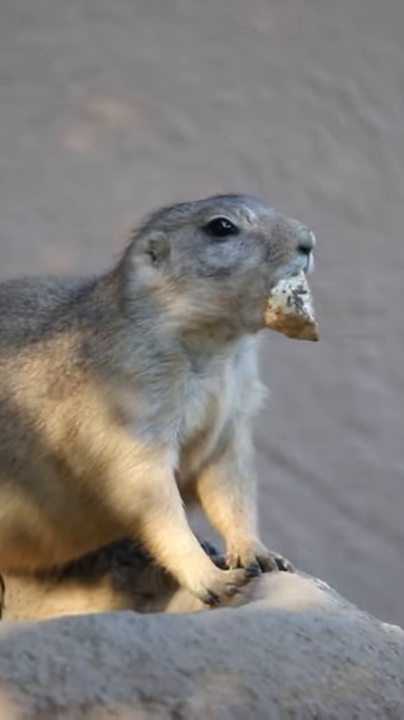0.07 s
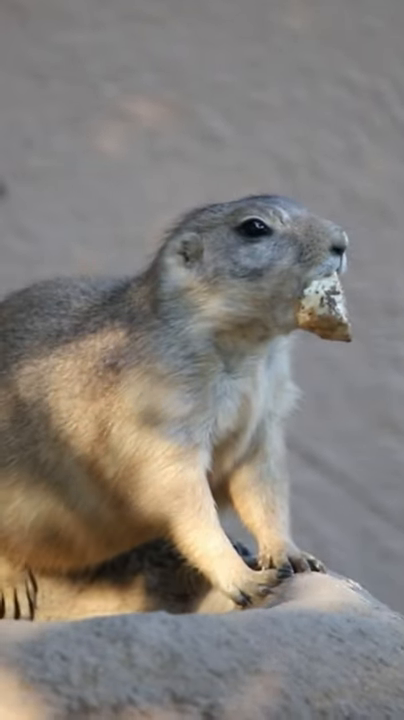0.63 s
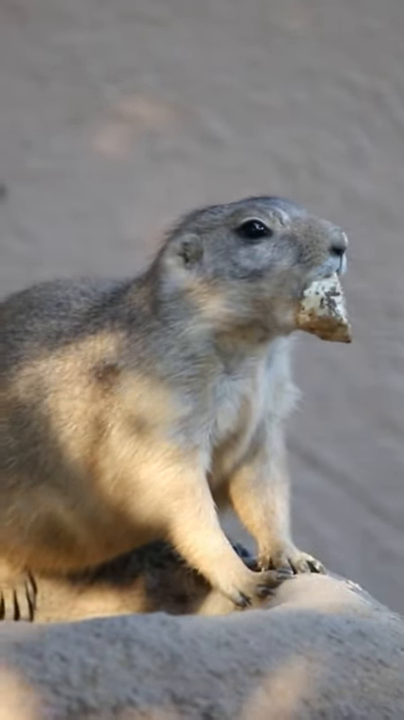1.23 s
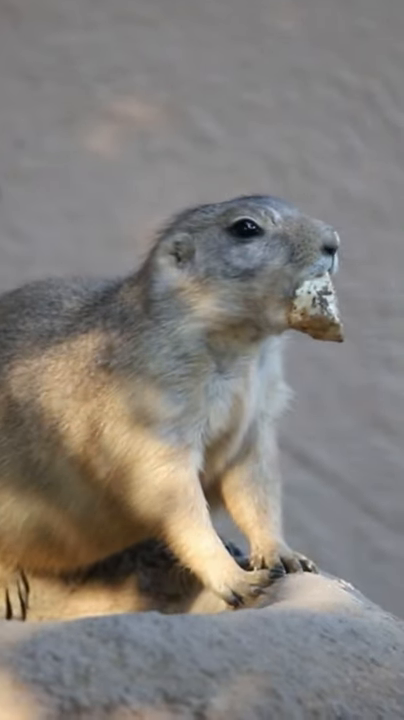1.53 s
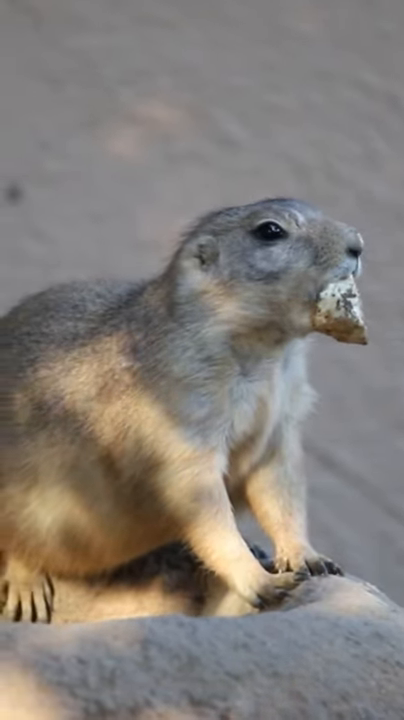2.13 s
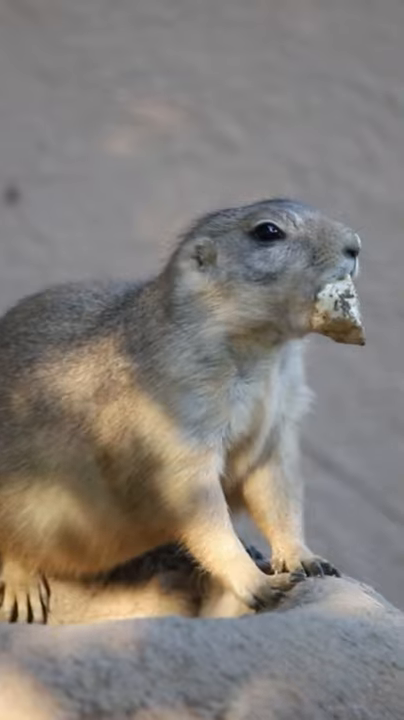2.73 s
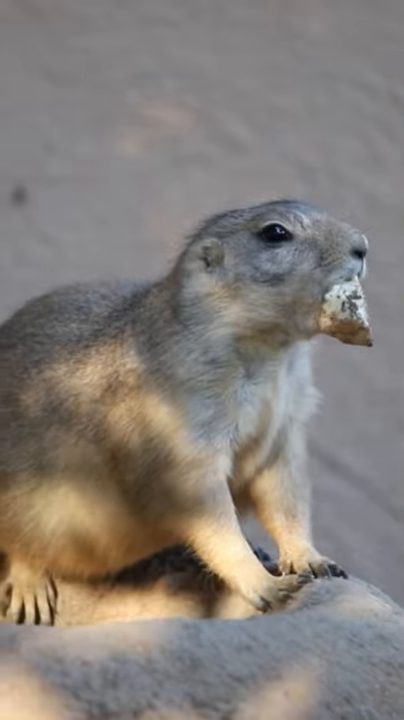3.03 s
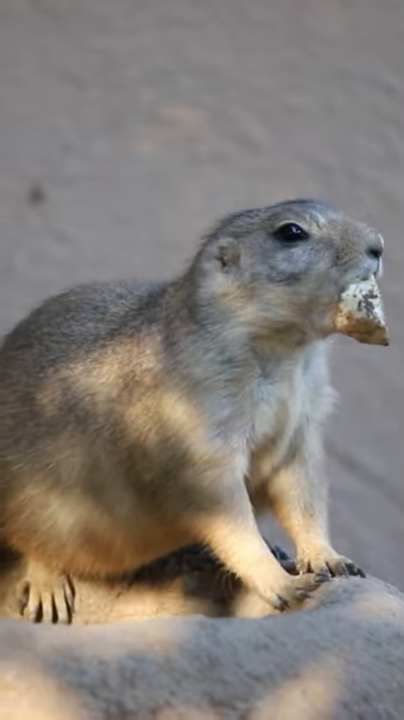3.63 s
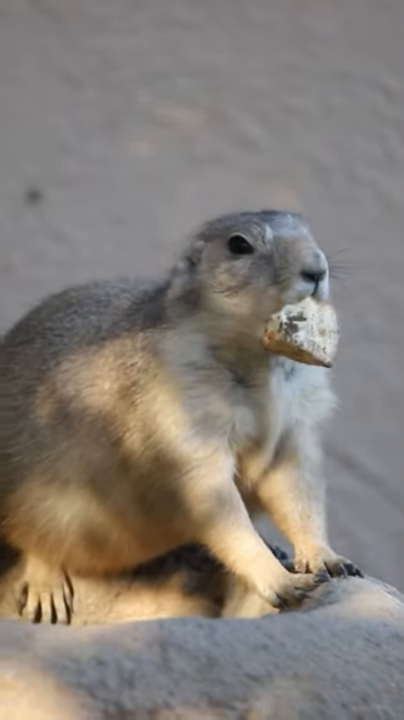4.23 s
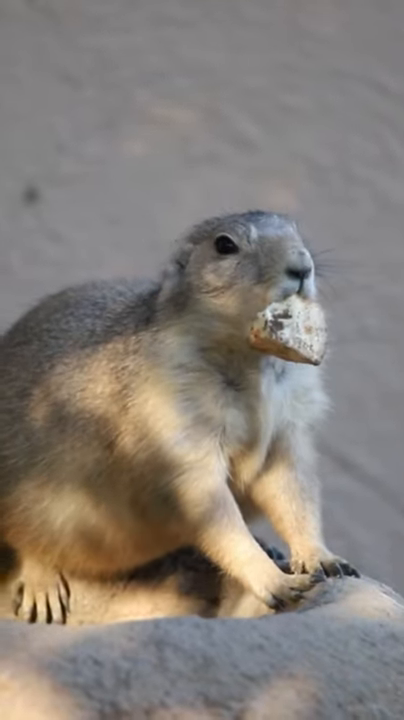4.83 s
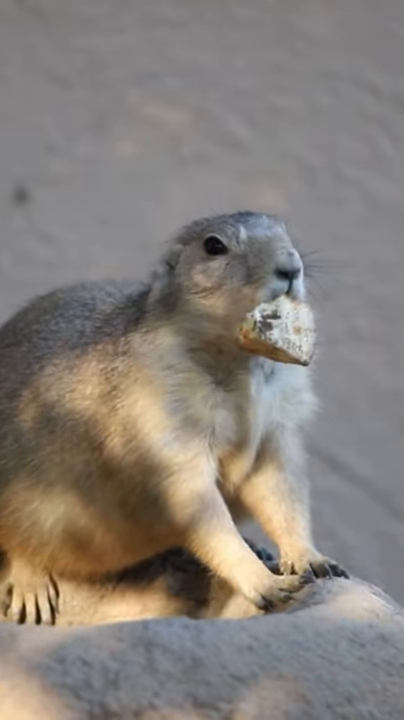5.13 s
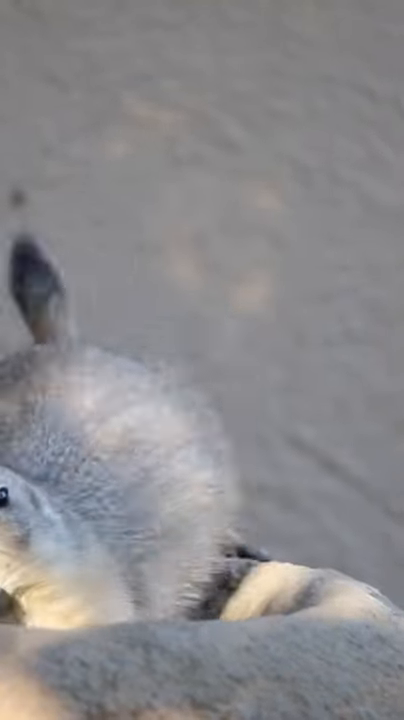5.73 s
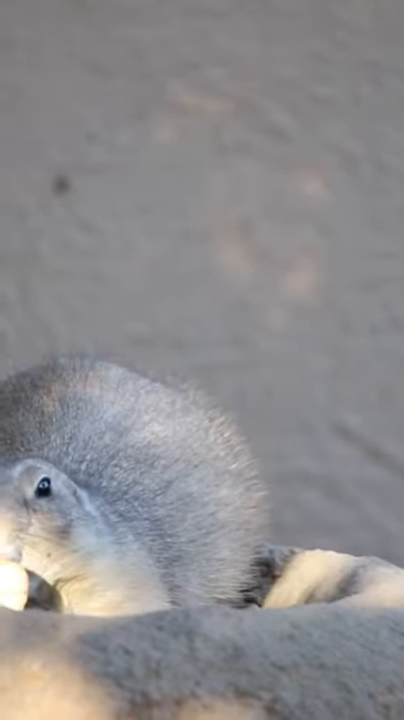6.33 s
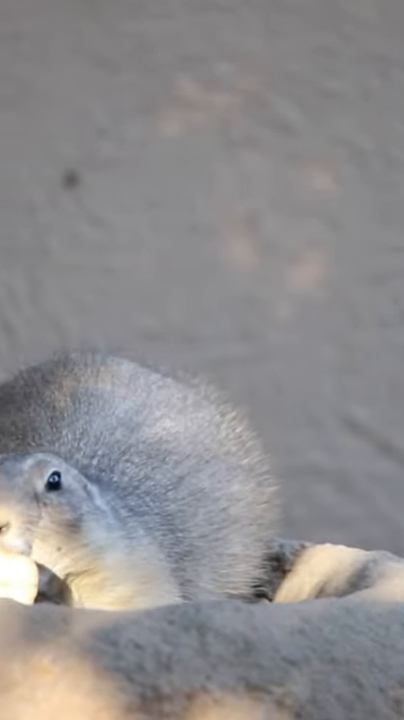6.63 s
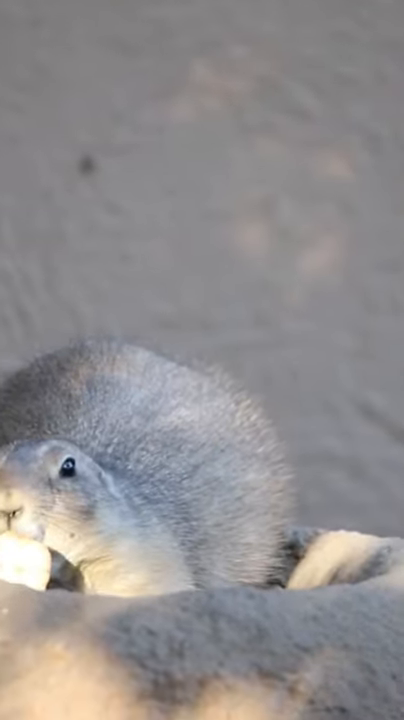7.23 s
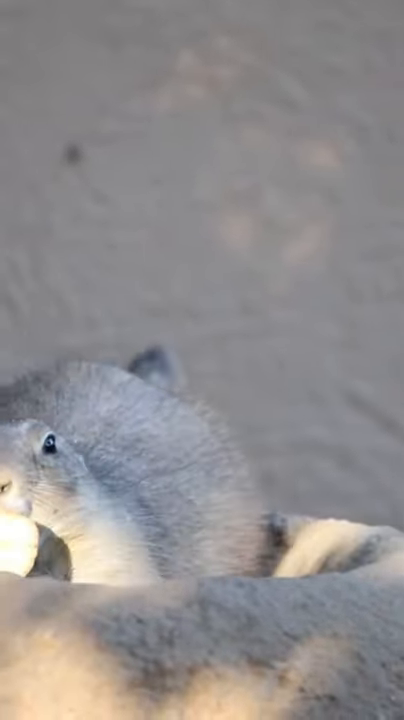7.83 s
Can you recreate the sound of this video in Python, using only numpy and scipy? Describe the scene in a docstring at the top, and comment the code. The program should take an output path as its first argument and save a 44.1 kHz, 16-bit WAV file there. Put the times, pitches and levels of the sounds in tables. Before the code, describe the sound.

A prairie dog barks close by in short, sharp, high yips, with a small bird trilling faintly in the quiet outdoor air.

```python
"""Eighteen barks, close to the microphone: a prairie dog with food in its mouth, in a quiet outdoor pen.
Each bark is about 40 ms of vocal-fold pulses on an arch of pitch; the hard ones start clean and break
into a rasp. Between them the animal wheezes softly through its nose. A few ticks and low bumps sound
nearby. Farther out a small bird repeats a four-note trill of falling whistles, and others call far off.
Behind it all lie open air and a faint mains hum, heard in stereo through two closely spaced ports."""
import sys
import numpy as np
from scipy import signal
from scipy.fft import rfft, irfft
from scipy.io import wavfile
from scipy.ndimage import uniform_filter1d, minimum_filter1d

SR = 44100
rng = np.random.default_rng(int(sys.argv[2]) if len(sys.argv) > 2 else 0)


def file_out(sig):
    """Save sig as 16-bit WAV at sys.argv[1]."""
    # one column per channel
    cols = np.atleast_2d(sig).T
    # limit, then scale
    lim = np.clip(cols, -1, 1)
    pcm = np.round(lim * 32767).astype(np.int16)
    wavfile.write(sys.argv[1], SR, pcm)


N = 356328


def prairie_dog(break_hz=1516, break_width_hz=122, full_db=-12, lead_gap_s=.018, after_gap_s=.052):
    """The animal, close up: each bark between two wheezes, rougher and longer above the breaking pitch."""
    # t/s, level/dB, top pitch/Hz, wheeze before/dB, wheeze after/dB, length of the latter/s
    barks = [(.3925, -12.7, 1800, -57, -52, .09), (.798, -16.2, 1630, -50.5, -52.5, .098),
             (1.1683, -16.4, 1631, -49.5, -52.5, .058), (1.7913, -14.8, 1708, -61, -52.5, .079),
             (2.3869, -13.5, 1775, -52, -53, .072), (3.01, -13, 1774, -52, -48.5, .046),
             (3.5415, -11.8, 1799, -60, -49.5, .093), (3.9303, -19.8, 1525, -45.5, -52.5, .036),
             (4.2786, -22.4, 1373, -45.5, -53.5, .056), (4.8768, -12.8, 1766, -51, -48.7, .099),
             (5.2948, -20.1, 1506, -44.5, -52, .115), (5.6586, -15.1, 1672, -46.5, -50.5, .11),
             (6.0301, -16.6, 1595, -43.5, -50, .11), (6.591, -12.3, 1778, -55.5, -49.5, .11),
             (6.9635, -12.7, 1715, -60, -53.5, .036), (7.2952, -13.6, 1683, -46.5, -51.5, .064),
             (7.6506, -20.9, 1483, -46.5, -53, .044), (7.9838, -15.6, 1629, -48.5, -55, .05)]
    # reedier wheezes in the long pauses: t/s, length/s, level/dB, glide/octaves
    pause_wheezes = [(.083, .098, -54.5, -.44), (1.505, .096, -54.5, -.63), (2.116, .054, -48.7, .2),
                     (2.705, .1, -53, -.3), (3.324, .11, -52.5, -.68), (4.594, .085, -49.5, -.21),
                     (6.335, .11, -50, -.45)]
    out = np.zeros(N)
    for s, db, hz, lead_db, after_db, after_s in barks:
        over_hz, soft_db = max(hz - break_hz, 0), max(full_db - db, 0)
        length = .037 + .000023 * over_hz
        rough = max(.07, .99 * (1 - np.exp(-over_hz / break_width_hz)))
        add(out, s, bark(length, db, hz, rough))
        push_at = s - .0013 * soft_db  # a soft bark catches later between its two wheezes
        lead_s = .017 + .0032 * soft_db
        add(out, push_at - lead_gap_s - lead_s, wheeze(lead_s, lead_db, hz=710, glide=.28, airy=.53))
        after = wheeze(after_s, after_db, hz=790 - 1800 * after_s, glide=-.45, airy=.76)
        add(out, push_at + length + after_gap_s, after)
    for s, length, db, glide in pause_wheezes:  # the steeper the fall, the lower and clearer
        add(out, s, wheeze(length, db, hz=625 + 100 * glide, glide=glide, airy=.65 + .6 * glide))
    return out


def bark(length, db, top_hz, rough, alternation=.81, lurch=.13, jitter=.042,
         throb_db=4, throb_hz=125, rasp=.2, dulling=.09):
    """Vocal folds pulse on an arch of pitch; driven hard, they break into uneven strong and weak beats."""
    # course of a bark: share of its length, soft pitch/ratio, hard pitch/ratio, soft push/dB, hard push/dB
    arch = [(0, .97, .88, -3, -7), (.1, .99, .95, -.5, -1), (.24, 1, 1, 0, 1.5), (.45, .99, .97, 0, 0),
            (.65, .965, .94, -1, -1), (.85, .885, .84, -1.5, -6), (1, .75, .73, -4, -13)]
    # resonances of throat and mouth: f/Hz, gain/dB
    throat = [(300, -29), (550, -28), (850, -18.5), (1250, -18.5), (1750, -11), (2080, -13.5), (2650, 0),
              (3200, 1), (3750, 4), (4500, -9), (5300, -5.5), (6100, -10.5), (6850, -19), (7300, -36.5),
              (7800, -30), (8700, -23.5), (10500, -37), (15500, -51)]
    t, u = span(length)
    share, soft_pitch, hard_pitch, soft_db, hard_db = np.transpose(arch)
    effort = min(1, 2 * rough)
    hz = top_hz * np.interp(u, share, soft_pitch + effort * (hard_pitch - soft_pitch))
    push_db = np.interp(u, share, soft_db + effort * (hard_db - soft_db))
    since_break = u - (.42 - .22 * rough)  # harder barks break sooner
    broken = np.sqrt(rough * effort) * np.clip(since_break / .028, .1, 1)
    # the broken folds repeat about every two or three beats, and slip from one pattern to another
    kicks, slips = rng.standard_normal((2, 128))
    pattern = .86 * np.exp(2j * np.pi / rng.uniform(2.1, 3))
    swing = np.tanh(1.5 * evened(signal.lfilter([1], [1, -pattern], kicks).real))
    cycle = np.arange(len(swing))
    turns = np.cumsum(hz) / SR
    turns += broken * np.interp(turns, cycle, lurch * swing + jitter * slips)
    strength = np.maximum(1 + alternation * broken * np.interp(turns, cycle, swing), .05)
    # weak pushes close the folds gently, so the top harmonics come late and leave early
    folds = .5 + sum(gain_of(dulling * push_db * max(k - 2, 0)) * np.cos(2 * np.pi * k * turns)
                     for k in np.arange(1, 12))
    folds -= .25 * broken * np.cos(2 * np.pi * turns)  # the fundamental weakens as the voice breaks
    leak = .012 + .055 * effort
    breath = (leak + rasp * broken) * rng.standard_normal(len(t)) * (1 + np.cos(2 * np.pi * turns))
    # the rasp comes in a few surges
    throb = -np.sin(2 * np.pi * since_break * length * throb_hz * rng.uniform(.7, 1.35))
    surge_db = throb_db * broken * rough ** 2 * throb
    drive = (evened(folds) * strength + breath) * gain_of(push_db + surge_db)
    voice = colour(drive * fade(t, .0015 + .0008 * effort, .003), throat)
    return gain_of(db) * voice / np.sqrt(np.mean(voice[:len(t)] ** 2))


def wheeze(length, db, hz, glide, airy):
    """Air through the animal's nose: a wavering reedy tone in a puff of noise."""
    # resonances of the nose: f/Hz, gain/dB
    nose = [(250, -21.5), (500, -2.5), (750, 1), (1150, 2), (1450, -10.5), (1750, -8.5), (2100, -17),
            (2850, -6), (4000, -23), (5000, -19.5), (8000, -33.5), (14000, -45.5)]
    t, u = span(length)
    waver = .035 * airy * wander(len(t), size=50)
    turns = np.cumsum(hz * 2 ** (glide * (u - .5)) * (1 + waver)) / SR
    reed = sum(np.cos(2 * np.pi * k * turns) for k in np.arange(1, 8))
    puff = colour(2.2 * airy * rng.standard_normal(len(t)), [(900, 0), (3500, 4)])[:len(t)]
    flutter = gain_of(3 * airy * wander(len(t), size=200))
    rise, fall = (.5, .15) if glide > 0 else (.15, .45)  # rising: swell and stop; falling: die away
    shape = fade(t, rise * length, fall * length)
    return gain_of(db) * evened(colour(evened(reed) + puff, nose)[:len(t)] * flutter * shape)


def tick(db, hz, ring_db, t60, width_hz=800):
    """A small dry tick nearby: a snap of noise and one short resonance."""
    t, _ = span(.028)
    spectrum = [(200, -11.5), (900, 7.5), (5000, -9.5), (11000, -15.5), (15000, -25.5)]  # f/Hz, gain/dB
    snap = colour(rng.standard_normal(len(t)), spectrum)[:len(t)]
    pole = np.exp((-np.pi * width_hz + 2j * np.pi * hz) / SR)
    ring = signal.lfilter([1], [1, -pole], snap).real
    click = evened(evened(snap) + gain_of(ring_db) * evened(ring))
    return gain_of(db - 60 * t / t60) * click * fade(t, .0005, .005)


def bump(db, length=.15):
    """A soft swell of deep noise nearby."""
    t, _ = span(length)
    spectrum = [(25, -22), (55, 12), (85, 8), (160, -53), (600, -71), (3000, -90)]  # f/Hz, gain/dB
    noise = colour(rng.standard_normal(len(t)), spectrum)[:len(t)]
    return gain_of(db) * evened(noise * fade(t, .028, .13))


def distant_calls():
    """Well back from the microphone: the trilling bird, and yips and whistles from farther off."""
    # middle of each trill's first full note: t/s
    trills = [.203, .753, 1.121, 1.550, 1.955, 2.486, 2.905, 3.315, 3.748, 4.169, 4.667, 5.128, 5.548,
              5.934, 6.305, 6.706, 7.077, 7.444, 7.853]
    # how loud the bird sings: t/s, level/dB
    trill_level = [(0, -54), (2, -54), (2.5, -48.5), (3.3, -51), (4.2, -55), (8, -52.7)]
    # short yips, rich in overtones: t/s, length/s, level/dB
    yips = [(.236, .085, -56.5), (.727, .03, -53), (1.224, .038, -53), (1.613, .028, -63),
            (1.681, .032, -60.5), (2.216, .04, -58.5), (3.189, .028, -55.5)]
    # birds' whistles, nearly pure: t/s, length/s, start f/Hz, end f/Hz, level/dB
    whistles = [(0, .063, 2540, 2590, -50.5), (.31, .05, 3100, 1960, -53.5), (.542, .52, 2465, 2380, -68),
                (.953, .51, 2080, 2040, -66.5), (6.786, .14, 2960, 2820, -64.5),
                (7.122, .1, 2900, 2780, -59), (7.19, .063, 2800, 2300, -57.5),
                (7.557, .24, 2980, 2750, -57), (7.815, .06, 2740, 3080, -60)]
    out = np.zeros(N)
    for s in trills:
        early_s, notes = trill(np.interp(s, *np.transpose(trill_level)))
        add(out, s - early_s, notes)
    for s, length, db in yips:
        add(out, s, far_call(length, start_hz=1815, end_hz=1895, db=db, overtones_db=1))
    for s, *whistle in whistles:
        add(out, s, far_call(*whistle, overtones_db=-30))
    return out


def trill(db, step_s=.0435, lead_s=.036, lead_db=-10, high_hz=5650, low_hz=4700, note_s=.023):
    """A faint lead note and three full whistles, all sliding down; returns head start/s and sound."""
    t, u = span(note_s)
    shape = fade(t, .011, .01)
    out = np.zeros(SR // 4)
    for at, note_db, pitch in [(0, lead_db, .975)] + [(lead_s + k * step_s, 0, 1) for k in range(3)]:
        hz = (high_hz + (low_hz - high_hz) * u) * pitch * (1 + .004 * rng.standard_normal())
        gain = gain_of(db + note_db + rng.standard_normal())
        add(out, at, gain * np.sin(2 * np.pi * np.cumsum(hz) / SR) * shape)
    return lead_s + note_s / 2, out


def far_call(length, start_hz, end_hz, db, overtones_db):
    """A distant whistle or yip, arched, wavering and fading on its way."""
    t, u = span(length)
    overtones = gain_of(overtones_db)
    arch = .04 * overtones * np.sin(np.pi * u)
    waver = (.01 + .025 * overtones) * wander(len(t), size=25)
    waver += .017 * (start_hz / 2800) ** 6 * wander(len(t), size=400)  # high calls drift more
    hz = (start_hz + (end_hz - start_hz) * u) * (1 + arch + waver)
    angle = 2 * np.pi * np.cumsum(hz) / SR
    tone = np.sin(angle) + overtones * (np.sin(2 * angle) + .3 * np.sin(3 * angle))
    return gain_of(db + 2 * wander(len(t), size=400)) * tone * fade(t, .008, .36 * length)


def pen(x, spread=.45):
    """Short scatter from the pen's walls and rocks, mostly alike in both channels."""
    # decay of the scatter: f/Hz, t60/s
    decay = [(200, .1), (1500, .07), (3500, .06), (7000, .055), (14000, .045)]
    t, _ = span(.083)
    taps = rng.standard_normal((3, len(t))) * (rng.random((3, len(t))) < .15) * (t > .003)
    hz, at, spectra = signal.stft(taps[0] + spread * taps[1:], SR, nperseg=128)
    tail = signal.istft(spectra * gain_of(-60 * at / read(decay, hz)[:, None]), SR, nperseg=128)[1]
    return signal.fftconvolve(x[None], tail / np.linalg.norm(tail[0]), axes=1)[:, :N]


def open_air(db=-61, low_cut_hz=38):
    """The air around the pen: steady noise whose rumble and hiss swell slowly and ease off."""
    # spectrum of the air: f/Hz, relative density/dB
    spectrum = [(20, -8), (32, -2.5), (65, 3), (110, -7), (200, -13), (330, -9.5), (560, -13.5),
                (1040, -13), (2100, -17.5), (3100, -15.5), (5000, -19.5), (8500, -22.5), (12000, -25),
                (15500, -28)]
    # slow swells: t/s, rumble/dB, hiss/dB
    swell = [(0, 3, 0), (1.5, 0, .5), (2.8, 2.5, 1.3), (4.2, -.5, -1.5), (5, 1.5, -.5), (5.7, -1, -1.8),
             (8.08, -2, -.7)]
    # likeness of left and right: f/Hz, correlation
    likeness = [(30, 0.95), (3000, 1), (8000, 0.43), (15000, 0.61)]
    frames, hz = N // 256 + 5, np.fft.rfftfreq(1024, 1 / SR)
    s, *levels = np.transpose(swell)
    rumble_db, hiss_db = (np.interp(np.arange(frames) * 256 / SR, s, level) for level in levels)
    low = read([(120, 1), (350, .14)], hz)[:, None]
    high = read([(500, 0), (2500, .85), (8500, .76), (13000, .22)], hz)[:, None]
    a, b, c, d = rng.standard_normal((frames, len(hz), 4)).T
    same = read(likeness, hz)[:, None]
    left = a + 1j * b
    right = same * left + np.sqrt(1 - same ** 2) * (c + 1j * d)
    gain = gain_of(read(spectrum, hz)[:, None] + low * rumble_db + high * hiss_db)
    air = signal.istft(np.array([left, right]) * gain, nperseg=1024, noverlap=768)[1][:, :N]
    air = signal.sosfilt(signal.butter(4, low_cut_hz, "high", fs=SR, output="sos"), air)
    return gain_of(db) * evened(air)


def mains_hum():
    """Two faint steady tones from the mains, the same in both channels."""
    # f/Hz, level/dB
    tones = [(50.2, -72.5), (150.3, -74)]
    t = np.arange(N) / SR
    return sum(gain_of(db) * np.sin(2 * np.pi * (hz * t + rng.random())) for hz, db in tones)


def microphone_ports(x, lag_s=7e-6):
    """Two closely spaced ports: the sound reaches the right one a moment later."""
    hz = np.fft.rfftfreq(N, 1 / SR)
    return irfft(rfft(x) * np.exp(1j * np.pi * hz * lag_s * np.array([[1], [-1]])), N)


def gain_of(db):
    """Decibels to amplitude."""
    return 10 ** (np.asarray(db) / 20)


def evened(x):
    """Scales to rms 1."""
    return x / np.sqrt(np.mean(x ** 2) + 1e-20)


def read(points, hz):
    """Reads a spectrum on a log-frequency axis."""
    f, value = np.transpose(points)
    return np.interp(np.log(hz + 1), np.log(f + 1), value)


def add(mix, s, sound):
    """Mixes a sound in at time s."""
    part = mix[max(round(s * SR), 0):][:len(sound)]
    part += sound[:len(part)]


def span(length):
    """Times of one event, in seconds and as a share of its length."""
    t = np.arange(int(length * SR)) / SR
    return t, t / length


def fade(t, rise, fall):
    """Soft start and end."""
    return np.sin(np.pi / 2 * np.clip(np.minimum(t / rise, (t[-1] - t) / fall), 0, 1)) ** 2


def wander(count, size):
    """Smooth noise of rms 1 that changes over size samples."""
    return evened(uniform_filter1d(uniform_filter1d(rng.standard_normal(count), size), size))


def colour(x, spectrum, size=2048):
    """Causal filter with the given spectrum: f/Hz, gain/dB."""
    log_gain = np.log(gain_of(read(spectrum, abs(np.fft.fftfreq(size, 1 / SR)))))
    ring = np.fft.ifft(np.exp(signal.hilbert(log_gain).conj())).real
    return signal.fftconvolve(x, ring[:size // 2])


def scene(near_wet_db=-25, bird_wet_db=-15):
    """The prairie dog close to the microphone, the birds beyond, the open air behind."""
    # small dry ticks: t/s, level/dB, ring f/Hz, ring over snap/dB, t60/s
    ticks = [(2.326, -30.5, 4900, 14.5, 0.014), (2.54, -41, 3800, -3, .025), (3.3, -43, 4570, -30, 0.03),
             (3.483, -32, 1077, 18.5, 0.011), (4.501, -42.5, 1404, 0, 0.023)]
    # soft low bumps: t/s, level/dB
    bumps = [(2.47, -62.5), (2.70, -60), (4.60, -59)]
    near, birds = prairie_dog(), distant_calls()
    for s, *row in ticks:
        add(near, s, tick(*row))
    for s, db in bumps:
        add(near, s, bump(db))
    scatter = pen(gain_of(near_wet_db) * near + gain_of(bird_wet_db) * birds)
    return microphone_ports(near) + birds + scatter + open_air() + mains_hum()


def record(dry, ceiling=.96, edge_hz=15900):
    """The recorder: a quick limiter holds the tallest peaks under full scale; then the band limit."""
    gain = np.minimum(1, ceiling / (abs(dry).max(0) + 1e-9))
    held = dry * uniform_filter1d(minimum_filter1d(gain, size=129), size=129)
    low_pass = signal.firwin(511, edge_hz, window=("kaiser", 9), fs=SR)
    return signal.oaconvolve(held, low_pass[None], "same")


dry = scene()
out = record(dry)
file_out(out)
```